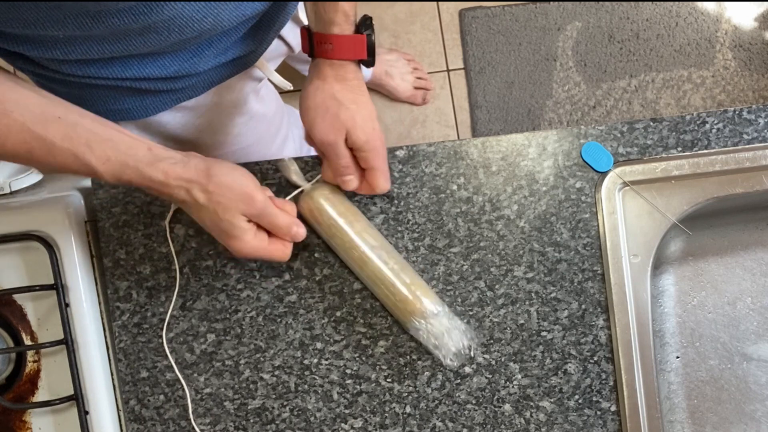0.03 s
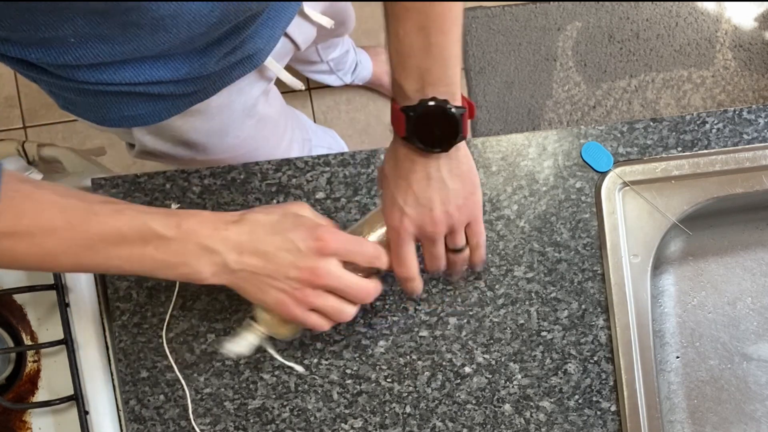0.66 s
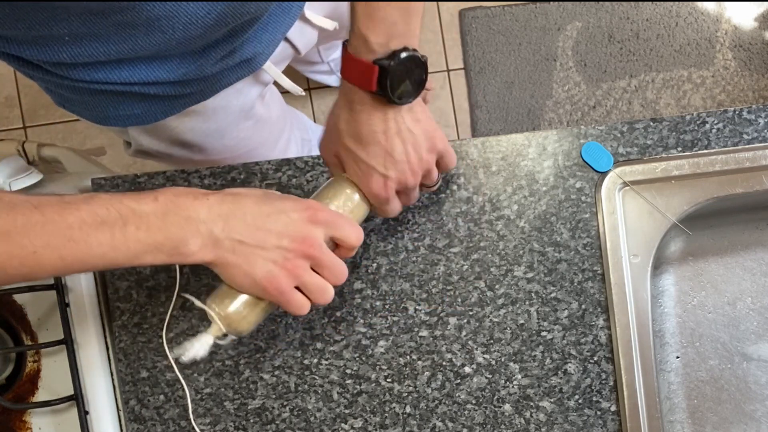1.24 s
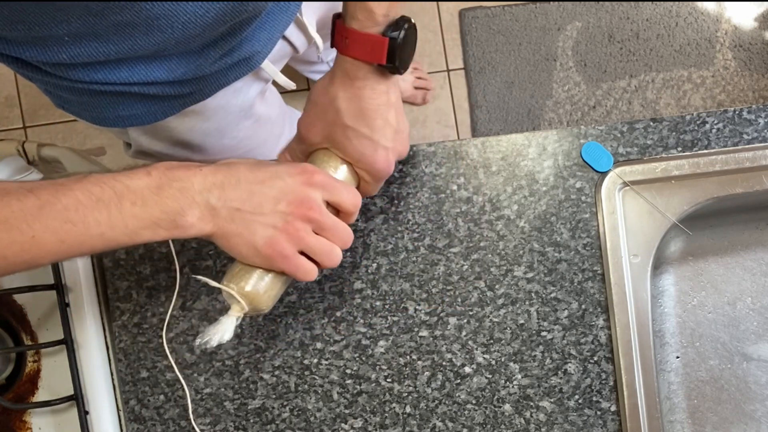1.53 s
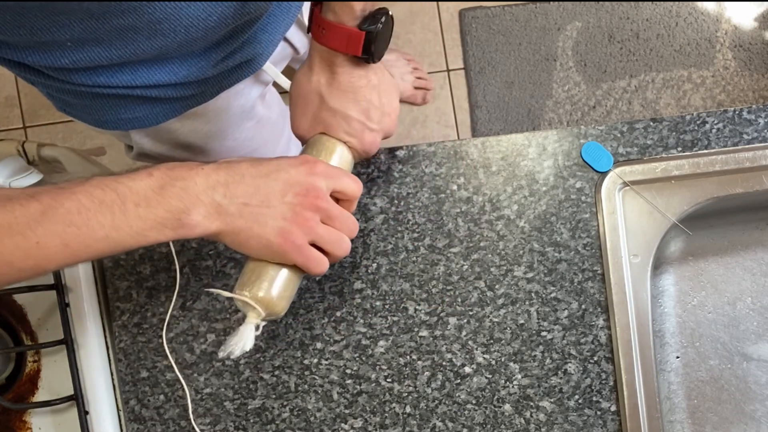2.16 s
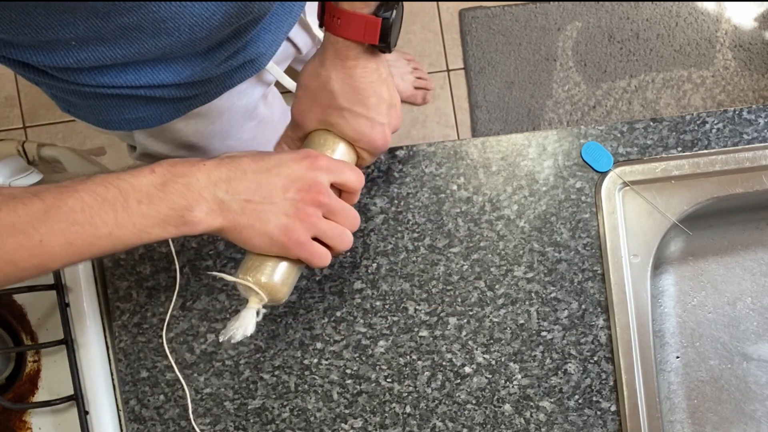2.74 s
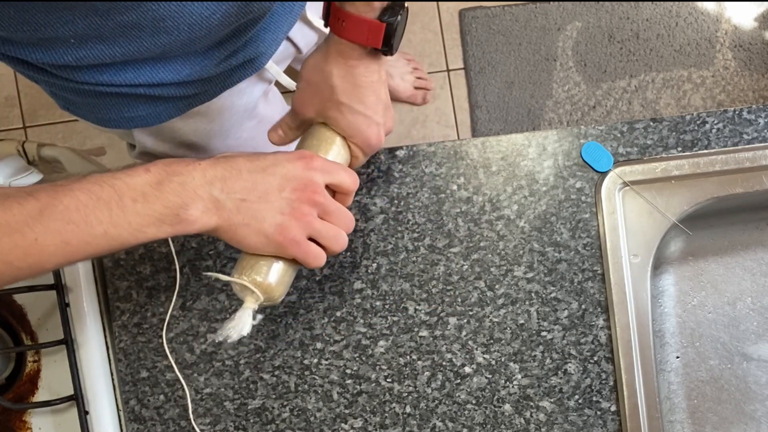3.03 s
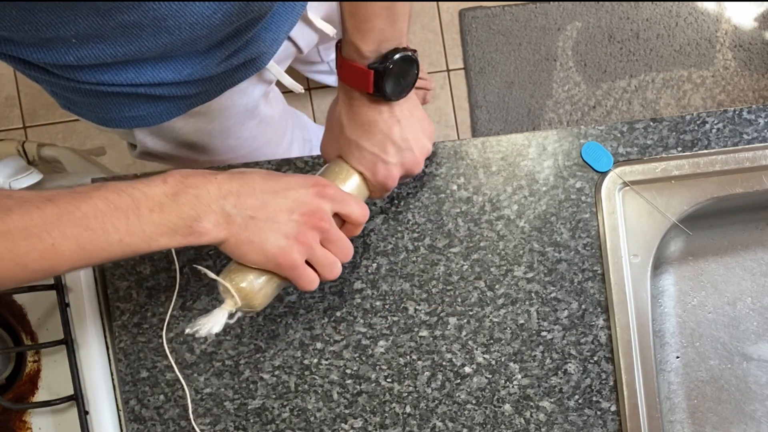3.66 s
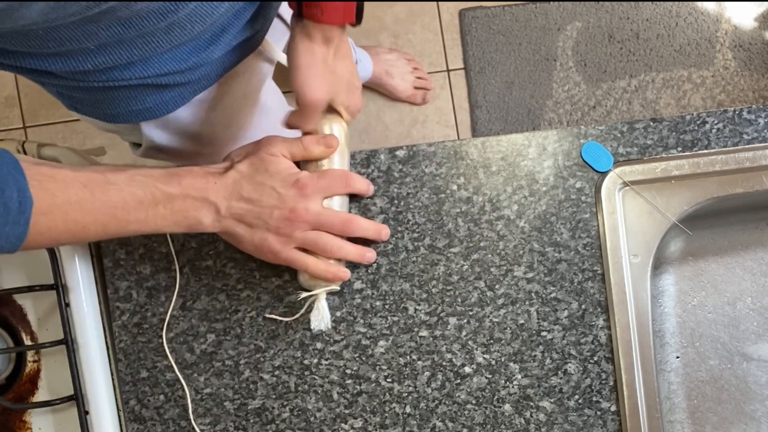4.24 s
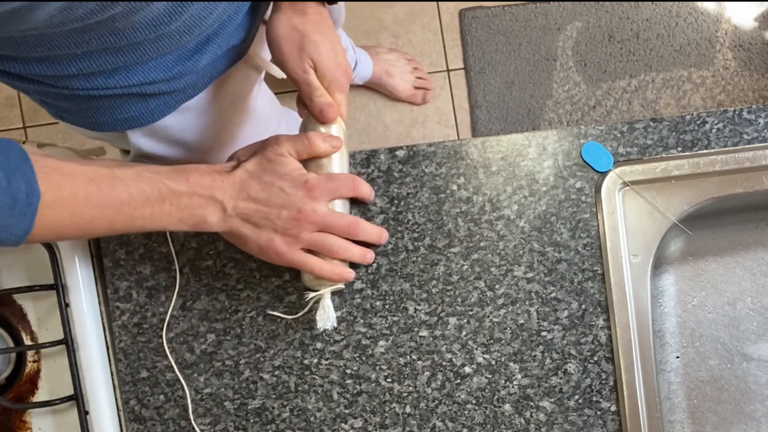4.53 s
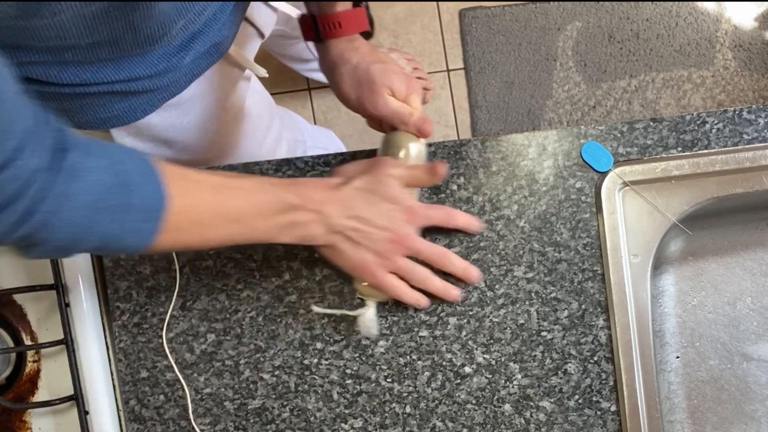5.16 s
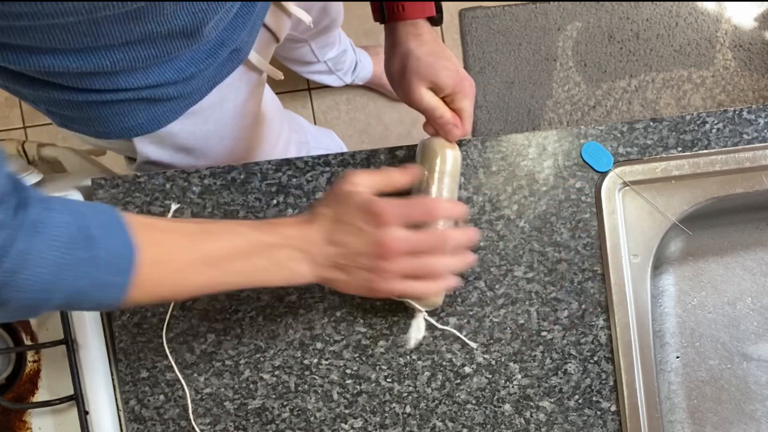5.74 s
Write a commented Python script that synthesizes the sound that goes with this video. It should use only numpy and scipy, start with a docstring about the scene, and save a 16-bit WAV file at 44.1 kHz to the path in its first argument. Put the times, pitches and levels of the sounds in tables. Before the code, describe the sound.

Hands twist and turn a plastic-wrapped food roll, the film rustling and crackling, before the roll thumps down twice on a countertop.

```python
"""A food roll in plastic wrap is turned on a kitchen counter while its loose end is twisted for tying.
Over a steady low rumble the roll drags, and stick-slip friction makes the film crinkle and scrape.
Two soft landings excite low resonances of counter and room; creases snap and skin rubs taut film.
The film is loudest near 1.4 s; near 4.1 s and 5.2 s the roll lands more heavily, among lighter bumps.
A stereo microphone above hears it all with the reflections of a small hard room."""
import sys
import numpy as np
from scipy import signal
from scipy.fft import rfft, irfft, next_fast_len
from scipy.io import wavfile

SR = 44100
rng = np.random.default_rng(int(sys.argv[2]) if len(sys.argv) > 2 else 0)


def to_wav(s):
    """Save 16-bit WAV."""
    ch = np.atleast_2d(s).T  # columns
    pcm = np.round(np.clip(ch, -1, 1) * 32767)  # PCM
    wavfile.write(sys.argv[1], SR, pcm.astype(np.int16))


N = 264046
T = np.arange(N) / SR
FFT_SIZE = next_fast_len(N, real=True)
HZ = np.fft.rfftfreq(FFT_SIZE, 1 / SR)


def gain_of(db):
    """Amplitude ratio of a level; all levels here are relative."""
    return 10 ** (np.asarray(db) / 20)


def unit_rms(x):
    """Normalisation to rms 1."""
    return x / np.sqrt(np.mean(x ** 2) + 1e-20)


def lookup(table, hz, column=1):
    """Interpolation along log frequency."""
    columns = np.transpose(table)
    return np.interp(np.log(hz + 1), np.log(columns[0] + 1), columns[column])


def coloured(x, spectrum):
    """Spectral shaping, at rms 1."""
    return unit_rms(irfft(rfft(x, FFT_SIZE) * gain_of(lookup(spectrum, HZ)), FFT_SIZE)[..., :N])


def drift(rate_hz):
    """Random fluctuation: low-passed noise of rms 1."""
    return unit_rms(signal.sosfilt(signal.butter(2, rate_hz, fs=SR, output="sos"), rng.standard_normal(N)))


def add(mix, s, sound):
    """Superposition of a sound at time s."""
    part = mix[max(round(s * SR), 0):][:len(sound)]
    part += sound[:len(part)]


def resonate(x, hz, width_hz):
    """Forced response of a resonator whose frequency may glide."""
    turn = np.exp(2j * np.pi * np.cumsum(hz * np.ones(len(x))) / SR)
    pole = np.exp(-np.pi * width_hz / SR)
    return 2 * (turn * signal.lfilter([1 - pole], [1, -pole], x / turn)).real


def highpass(x, edge_hz):
    """Fourth-order bass roll-off."""
    return signal.sosfilt(signal.butter(4, edge_hz, "highpass", fs=SR, output="sos"), x)


def gesture(start, rise_s, hold_s, release_db_per_s):
    """Pressure envelope: smooth rise, hold, exponential decay."""
    build = np.sin(np.pi / 2 * np.clip((T - start) / rise_s, 0, 1)) ** 2
    return build * gain_of(-release_db_per_s * np.maximum(T - start - rise_s - hold_s, 0))


def slips(per_s, spread_db, clump_db, largest=4):
    """Stick-slip friction: random impulses of unequal size, swelling in clumps."""
    size = gain_of(spread_db * np.minimum(rng.exponential(1, N), largest) + clump_db * drift(rate_hz=91))
    return unit_rms(size * rng.choice([-1, 1], N) * (rng.random(N) < per_s / SR))


# Spectrum of the background: f/Hz, level/dB
RUMBLE_SPECTRUM = [(20, -15), (45, -1), (70, 3.5), (95, -20.5), (130, -1), (210, -21.5), (300, -12.5),
                   (370, -15), (480, -27), (800, -28.5), (1080, -29.5), (1500, -36), (5000, -43.5),
                   (14000, -43.5)]
def background(rumble_db=-66, whine_db=-87, whine_hz=1110, apart_hz=450):
    """Stationary noise: a rumble, coherent between the sides in the bass, and a narrow-band whine."""
    common, own = rng.standard_normal(FFT_SIZE), rng.standard_normal((2, FFT_SIZE))
    apart = HZ / (HZ + apart_hz)
    air = irfft(rfft(common) * np.sqrt(1 - apart ** 2) + rfft(own) * apart, FFT_SIZE)
    whine = np.array([unit_rms(resonate(side[:N], whine_hz, width_hz=32)) for side in own])
    return gain_of(rumble_db) * coloured(air, RUMBLE_SPECTRUM) + gain_of(whine_db) * whine


# Low resonances of counter and room: f/Hz, level/dB, T60/s
LOW_MODES = [(61.76, -16.5, 0.85), (69.4, 2.5, 0.19), (105.67, 2, 0.19), (125, 1.5, 0.1), (136.9, -15, 0.6),
             (167.5, -16, 0.29), (264.4, -38.5, 0.61), (279.8, -11.5, 0.166), (358, -19.5, 0.07),
             (355.8, -10, 0.14), (515, -38, 0.3), (653, -16.5, 0.092)]
def boom(swell_cycles=1.0):
    """Modal response: impacts and dragging ring counter and room, joined by the slap of the filling."""
    t = np.arange(SR) / SR
    hz, db, t60 = np.transpose(LOW_MODES)[:, :, None]
    swell = 1 - np.exp(-t * hz / swell_cycles)  # the boom swells over its first cycles
    ring = (gain_of(db - 60 * t / t60) * np.sin(2 * np.pi * hz * t) * swell).sum(0)
    contacts = bumps() + landings()
    sound = thumps(contacts, ring) + slaps(contacts) + dragging(ring)
    return highpass(sound, edge_hz=55.4)  # the counter radiates little of the deepest bass


# The roll dragged and kneaded on the counter: t/s, hold/s, level/dB
ROLL_DRAGS = [(0.0, 1.2, -62.5), (2.95, 0.31, -63.5), (4.1, 1.3, -66.5)]
def dragging(ring):
    """Frictional excitation: a random force keeps the low modes ringing."""
    pressure = sum(gain_of(db) * gesture(s, 0.27, hold, release_db_per_s=30) for s, hold, db in ROLL_DRAGS)
    return unit_rms(signal.oaconvolve(drift(rate_hz=114), ring)[:N]) * pressure


# The held film stirring faintly: t/s, hold/s, crinkle level/dB
HAND_GRIPS = [(0.061, 0.19, -78.5), (0.364, 0.9, -80), (1.39, 0.7, -75), (2.473, 0.61, -78),
              (2.99, .35, -76.5), (3.574, 0.26, -85), (4.102, 0.41, -71.5), (4.573, 0.31, -77),
              (5.26, 0.23, -68.5)]
def grips(rise_s=0.047, flutter_db=2.5, scrape_db=-2):
    """Amplitude modulation by uneven finger pressure, as (envelope, scrape level) pairs."""
    flutter = gain_of(flutter_db * drift(rate_hz=13))
    return [(gesture(s, rise_s, hold, release_db_per_s=134) * gain_of(db) * flutter, scrape_db)
            for s, hold, db in HAND_GRIPS]


# Spectrum of loose film: f/Hz, level/dB
CRINKLE_SPECTRUM = [(300, -32), (1000, -24.5), (2500, -15), (4200, -3), (6000, 0.5), (8000, 2.5),
                    (10500, 2), (13500, 0), (15500, -7.5)]
def crinkle(ping_share=0.68, decay_cycles=3.2, facets=60):
    """Free vibration of small facets, each at its own pitch, over a fizz of slips."""
    fizz = slips(per_s=8000, spread_db=4.5, clump_db=1.64, largest=1.94)
    pings, t = np.zeros(N), np.arange(SR // 150) / SR
    for hz in np.linspace(2200, 14000, facets):
        ping = np.sin(2 * np.pi * hz * t) * np.exp(-t * hz / decay_cycles)
        for when, weakness in rng.random((70, 2)):
            add(pings, when * N / SR, ping / (weakness + 0.065) ** 0.49)  # many small, a few large
    return coloured(fizz + ping_share * unit_rms(pings), CRINKLE_SPECTRUM)


# Spectrum of film pressed under the hands: f/Hz, level/dB
SCRAPE_SPECTRUM = [(150, -23.5), (450, -7.5), (850, -3.5), (1400, -4.5), (2300, -1.5), (3300, -1.5),
                   (5000, -4), (8000, -23.5), (15000, -26.5)]
def scrape():
    """Sliding friction: dense slips merge into mid-range noise."""
    return coloured(slips(per_s=3500, spread_db=4.0, clump_db=3.5, largest=1.67), SCRAPE_SPECTRUM)


def wrap():
    """Incoherent addition: strokes and grips sum in power to drive crinkle and scrape."""
    moves = strokes() + grips()
    crinkling = np.sqrt(sum(envelope ** 2 for envelope, _ in moves))
    scraping = np.sqrt(sum((envelope * gain_of(db)) ** 2 for envelope, db in moves))
    return gain_of(0.46) * crinkle() * crinkling + gain_of(-2.17) * scrape() * scraping


# The roll flopping down: t/s, level/dB, contact/ms, lead of the end/s, end re body/dB
ROLL_LANDINGS = [(0.192, -41, 4.4, 0.06, -1.5), (0.5043, -33, 3.94, 0.0122, -8),
                 (4.1249, -22, 6.15, 0.01025, -6), (5.239, -19, 4.55, 0.019, -4)]
def landings(rebound_s=0.029, rebound_db=-10):
    """Inelastic impact in three contacts: one end, the body, a weaker rebound."""
    contacts = []
    for s, db, ms, lead_s, end_db in ROLL_LANDINGS:
        end = (s - lead_s, db + end_db, ms * 0.82)  # lighter, so it touches more briefly
        rebound = (s + rebound_s, db + rebound_db, ms * 0.86)
        contacts += [end, (s, db, ms), rebound]
    return contacts


def thumps(contacts, ring):
    """Gaussian force pulses ring counter and room; a long contact excites only the lowest modes."""
    force, t = np.zeros(N), np.arange(-SR // 100, SR // 100) / SR
    for s, db, contact_ms in contacts:
        push = np.exp(-8 * (1000 * t / contact_ms) ** 2)
        add(force, s + t[0], gain_of(db) * push / push.sum())
    return signal.oaconvolve(force, ring)[:N]


def slaps(contacts, level_db=-7, hz=405, rise_s=0.0036):
    """Impact noise of the soft filling: a band-limited burst, stronger for a brisk contact."""
    out, age = np.zeros(N), np.arange(SR // 10) / SR / rise_s
    for s, db, contact_ms in contacts:
        burst = rng.standard_normal(len(age)) * age * np.exp(1 - age)
        add(out, s, gain_of(db) * burst / (1 + (contact_ms / 3) ** 4))
    band = signal.butter(5, [hz / 1.5, hz * 1.5], "bandpass", fs=SR, output="sos")
    return gain_of(level_db) * signal.sosfilt(band, out)


# A hand squeezing or sliding: t/s, rise/s, hold/s, crinkle level/dB, scrape re crinkle/dB
HAND_STROKES = [(0.183, 0.046, 0.021, -74, -7), (0.455, 0.0085, .12, -70.5, 1),
                (0.683, 0.0063, 0.041, -64, 0.5), (0.733, 0.12, 0.074, -56.5, 2.5),
                (0.908, 0.086, 0.093, -55, -2), (1.284, 0.062, 0.012, -46.5, -13),
                (1.348, 0.028, 0.0049, -49, 2), (1.484, 0.087, 0.0059, -61, -2.5),
                (1.686, 0.01, 0.016, -69, -10), (1.771, 0.042, 0.03, -70, -1),
                (1.926, 0.063, 0.038, -60.5, 0.5), (2.067, 0.035, 0.017, -66.5, -12),
                (2.266, 0.12, 0.0032, -58.5, -7), (2.317, 0.061, 0.023, -53.5, 3.5),
                (2.659, 0.013, 0.049, -68.5, -1), (2.697, 0.034, 0.023, -64.5, -4),
                (3.235, 0.038, 0.087, -76.5, -10), (3.685, 0.074, 0.055, -77, -4),
                (3.96, 0.029, 0.009, -59.5, -5), (4.104, 0.0057, 0.0073, -65, 0.5),
                (4.265, 0.032, 0.076, -69.5, 1.5), (4.43, 0.048, 0.012, -70, 7),
                (4.682, .015, .16, -69.5, -12), (4.908, 0.046, 0.01, -66.5, -17),
                (5.097, 0.007, 0.09, -64.5, -8.5), (5.139, 0.098, 0.054, -57.5, -8.5),
                (5.321, 0.056, 0.073, -61.5, -17), (5.64, 0.029, 0.01, -70, -29)]
def strokes():
    """Loading and quick relaxation of the film, as (envelope, scrape level) pairs."""
    return [(gesture(s, rise, hold, release_db_per_s=250) * gain_of(db), scrape_db)
            for s, rise, hold, db, scrape_db in HAND_STROKES]


# Creases snapping over: t/s, level/dB, f/Hz, ping re crack/dB
CREASE_SNAPS = [(0.466, -56, 2310, 6), (.621, -61.5, 2420, 10), (.624, -50.5, 10500, 10),
                (0.692, -51.5, 1720, 5.5), (.919, -40, 1330, -5), (1.285, -56.5, 3120, -24),
                (1.367, -48, 3900, -13), (1.373, -28.5, 3800, -10), (1.382, -48, 1300, 9),
                (1.692, -57, 9600, 8.5), (1.82, -54, 9500, -23), (2.659, -61, 1770, 6),
                (3.118, -53.5, 9500, -2), (3.236, -57.5, 6400, -11), (3.342, -58.5, 6500, 0),
                (3.758, -68, 3720, 10), (3.767, -62, 1760, 11.5), (3.982, -35, 7450, -42),
                (3.989, -44, 2430, -0.5), (4.446, -50, 7000, -13), (4.483, -47, 8160, -16),
                (4.69, -57.5, 7300, -3), (4.808, -55, 7040, 1), (4.961, -53.5, 8100, -7),
                (5.11, -51, 7200, -3), (5.276, -43, 8000, -20), (5.831, -67, 8370, 5)]
def snaps(crack_s=0.00047, ping_s=0.0011, level_db=-1, spread_octaves=1.75):
    """Snap-through of a crease: a short crack centred on the pitch of its damped ping."""
    out, t = np.zeros(N), np.arange(1024) / SR
    bin_hz = np.fft.rfftfreq(len(t), 1 / SR) + 1
    for s, db, hz, ping_db in CREASE_SNAPS:
        colour = 1 / np.hypot(1, np.log2(bin_hz / hz) / spread_octaves) ** 2
        noise = unit_rms(irfft(rfft(rng.standard_normal(len(t))) * colour))
        crack = noise * (t / crack_s) * np.exp(1 - t / crack_s)
        ping = gain_of(ping_db) * np.sin(2 * np.pi * hz * t) * np.exp(-t / ping_s)
        add(out, s, gain_of(db + level_db) * (crack + ping))
    return out


# Single bumps of roll or hand on the counter, some within a landing: t/s, level/dB, contact/ms
SINGLE_BUMPS = [(0.4673, -39.5, 0.72), (0.4782, -40, 2.1), (4.3245, -46.5, 2.2), (4.4868, -51, 2.7),
                (4.8497, -48.5, 4), (5.121, -34.5, 5.2), (5.2473, -40.5, 1.9), (5.4381, -45, 3.9)]
def bumps():
    """Impulsive excitation: one contact for each bump."""
    return list(SINGLE_BUMPS)


# Skin dragging on taut film: t/s, duration/s, first f/Hz, last f/Hz, level/dB
SKIN_RUBS = [(0.685, 0.028, 1690, 1700, -64), (0.724, 0.014, 2330, 3100, -58.5),
             (0.965, 0.091, 2860, 3220, -58), (1.303, 0.085, 3600, 1890, -50),
             (1.527, 0.11, 1640, 1800, -70), (2.341, 0.1, 2580, 2030, -60.5),
             (2.646, 0.16, 1690, 1500, -69.5), (3.978, 0.046, 2340, 2580, -64.5),
             (4.15, 0.38, 1520, 1800, -75.5), (4.66, 0.21, 2160, 2740, -78.5),
             (5.401, 0.059, 1310, 1304, -71)]
def rubs(width_share=0.47):
    """Stick-slip drives a broad resonance of taut film whose pitch slides with the grip."""
    out, drive = np.zeros(N), slips(per_s=3000, spread_db=1.5, clump_db=0.5)
    for s, duration, first_hz, last_hz, db in SKIN_RUBS:
        stroke = drive[round(s * SR):][:round(duration * SR)]
        hz = np.linspace(first_hz, last_hz, len(stroke))
        width_hz = width_share * first_hz * (0.086 / duration) ** 0.36  # a long stroke sings more clearly
        band = resonate(resonate(stroke, hz, width_hz), hz, width_hz)
        add(out, s, gain_of(db) * unit_rms(band) * signal.windows.tukey(len(stroke), .5))
    return out


# Reverberation time of the kitchen: f/Hz, T60/s
KITCHEN_DECAY = [(300, 0.39), (1300, 0.34), (3500, 0.21), (9000, 0.06), (15000, 0.1)]
def reflections(early_db=13.0, early_s=0.031):
    """Room impulse response: strong echoes from near walls, then a tail that dies faster in the treble."""
    t = np.arange(SR * 2 // 5) / SR
    echoes = rng.choice([-1, 1], (2, len(t))) * (rng.random((2, len(t))) < .2) * (t > .001)
    early_boost = 1 + gain_of(early_db) * np.exp(-t / early_s)
    hz, age, spectra = signal.stft(echoes * early_boost, SR, nperseg=256)
    decay = gain_of(-60 * age / lookup(KITCHEN_DECAY, hz)[:, None])
    tail = signal.istft(spectra * decay, SR, nperseg=256)[1]
    return tail / np.linalg.norm(tail, axis=1, keepdims=True)


def kitchen(x, responses=4, cycle_hz=4):
    """Time-varying reverberation: cross-faded responses stand for the moving hands and roll."""
    out = np.zeros((2, N))
    for k in range(responses):
        share = np.maximum(np.cos(2 * np.pi * (cycle_hz * T + k / responses)), 0)
        out += signal.oaconvolve((x * share)[None], reflections(), axes=1)[:, :N]
    return out


def scene(correlation=0.27):
    """Superposition of direct and reverberant sound; the deep bass gets no added echoes and leans left."""
    # the film's facets face many ways, so each side hears partly its own slips
    left, independent = wrap() + rubs(), wrap() + rubs()
    right = correlation * left + np.sqrt(1 - correlation ** 2) * independent
    creases, booming = snaps(), boom()
    film = np.array([left, right]) + creases
    rustle = gain_of(-1.5) * film + gain_of(-2) * kitchen(left + creases)
    bass = booming * gain_of([[1.4], [-1.4]]) + gain_of(3.5) * kitchen(highpass(booming, edge_hz=260))
    return rustle + bass + background() * gain_of([[.5], [-.5]])


# The microphone pair in the treble: f/Hz, share common to both sides (0-1), phase of the right/rad
MICROPHONE_PAIR = [(5000, 0, 0), (6500, .3, 0), (8200, 1, 0), (9500, 1, 0), (10800, .7, -1),
                   (12300, .65, -1.6), (13500, .8, -2.5), (14700, 1, -3.14)]
def record(dry, edge_hz=15600):
    """Interchannel coherence: the top octave is largely one signal with a turning phase, band-limited."""
    left, right = rfft(dry, FFT_SIZE)
    common = lookup(MICROPHONE_PAIR, HZ)
    right = (common * left + (1 - common) * right) / np.sqrt(1 - common * (1 - common))
    right *= np.exp(1j * lookup(MICROPHONE_PAIR, HZ, column=2))
    both = irfft(np.array([left, right]), FFT_SIZE)[:, :N]
    lowpass = signal.firwin(401, edge_hz, window=("kaiser", 9), fs=SR)
    return signal.oaconvolve(both, lowpass[None], "same")


dry = scene()
out = record(dry)
to_wav(out)
```